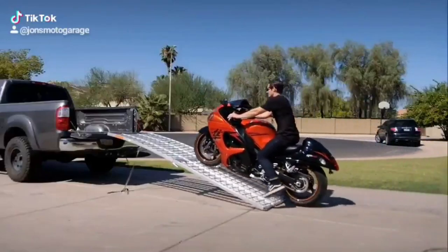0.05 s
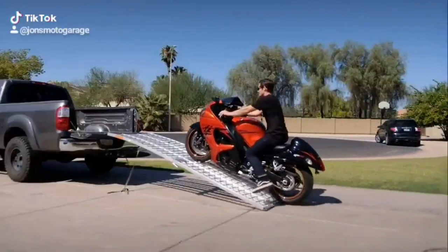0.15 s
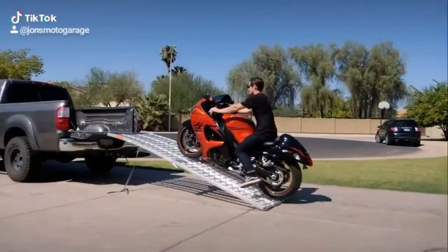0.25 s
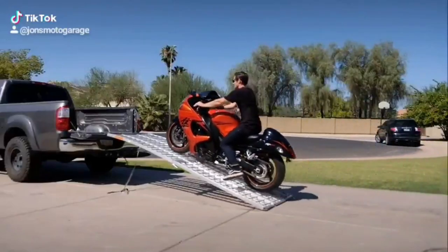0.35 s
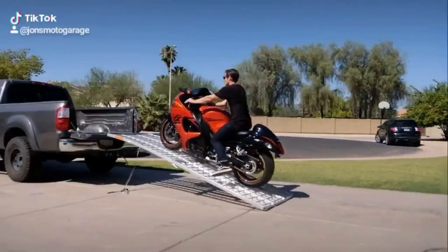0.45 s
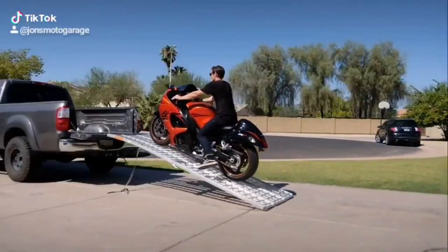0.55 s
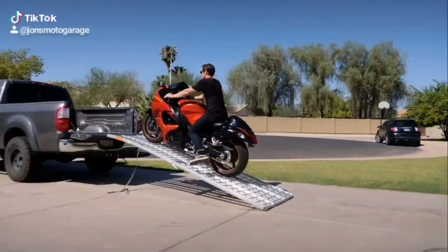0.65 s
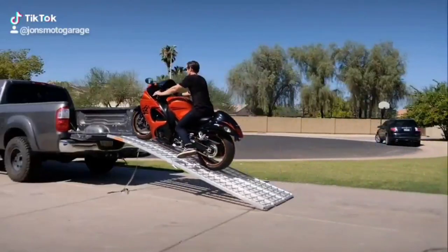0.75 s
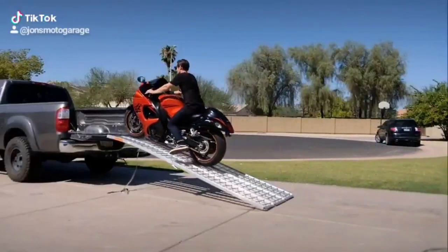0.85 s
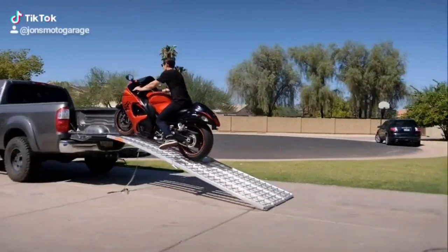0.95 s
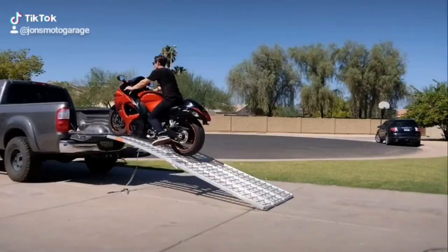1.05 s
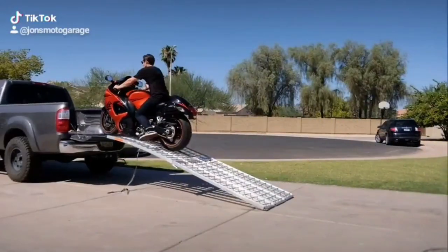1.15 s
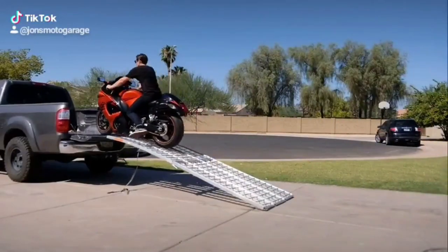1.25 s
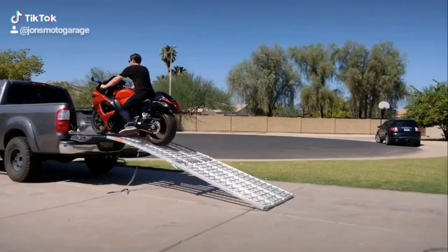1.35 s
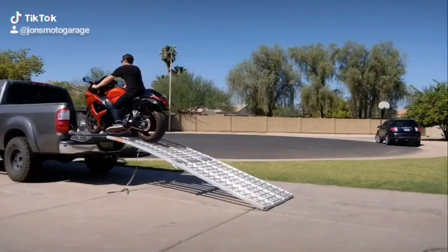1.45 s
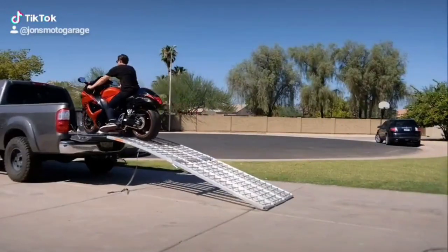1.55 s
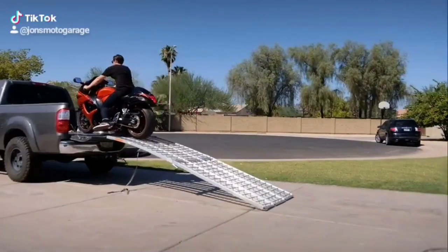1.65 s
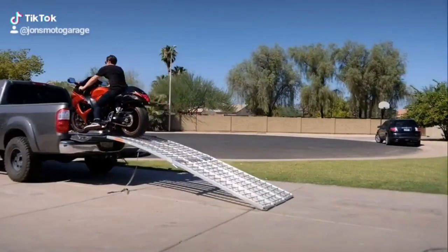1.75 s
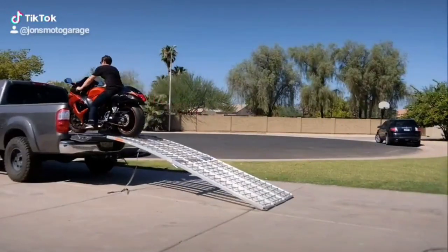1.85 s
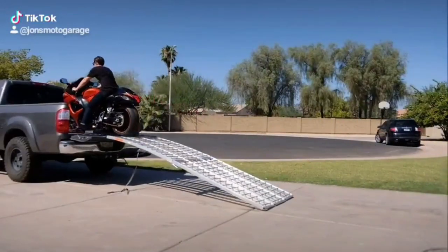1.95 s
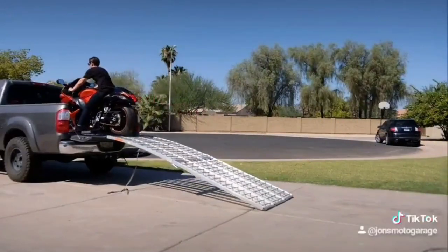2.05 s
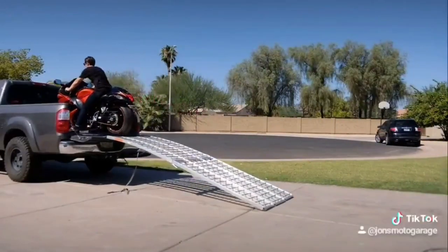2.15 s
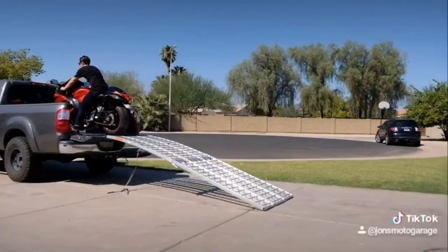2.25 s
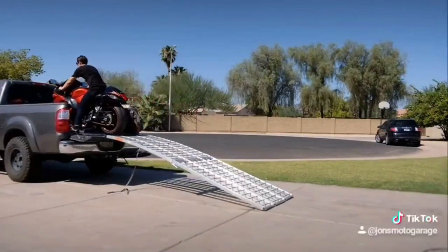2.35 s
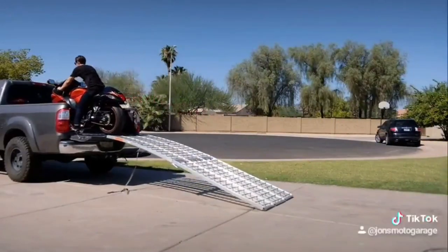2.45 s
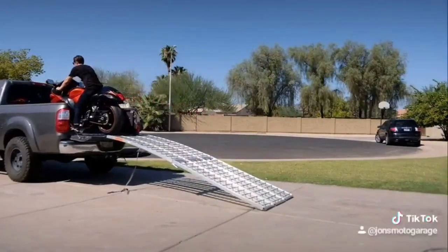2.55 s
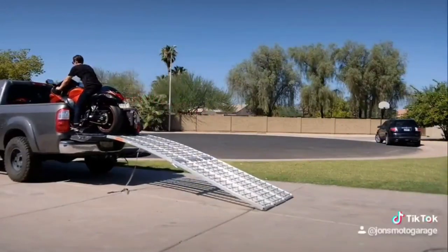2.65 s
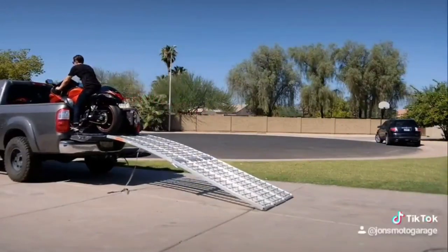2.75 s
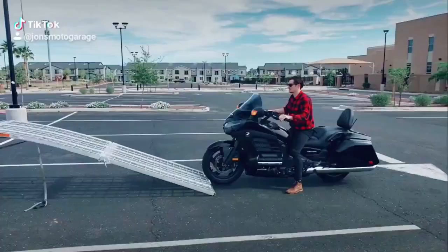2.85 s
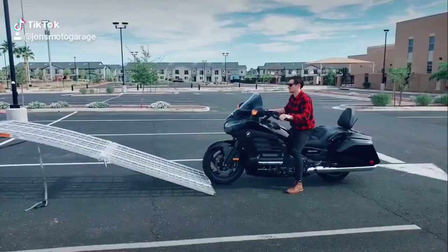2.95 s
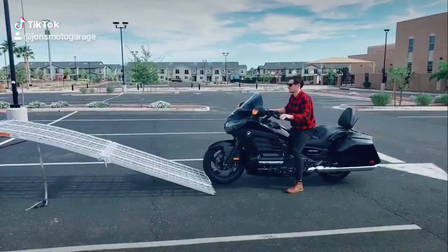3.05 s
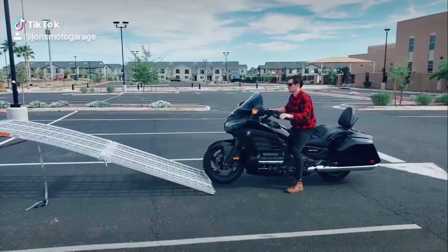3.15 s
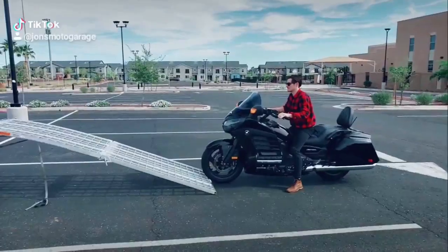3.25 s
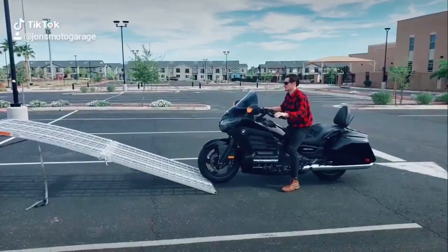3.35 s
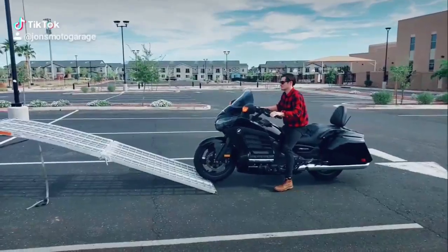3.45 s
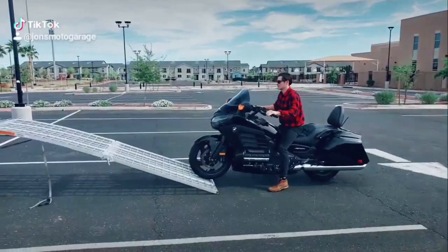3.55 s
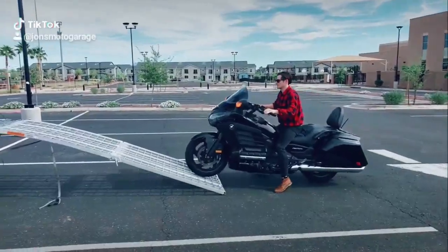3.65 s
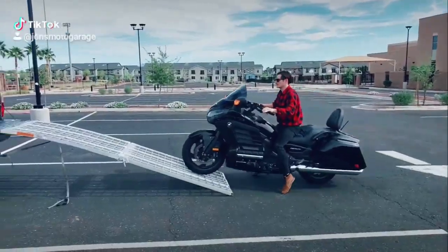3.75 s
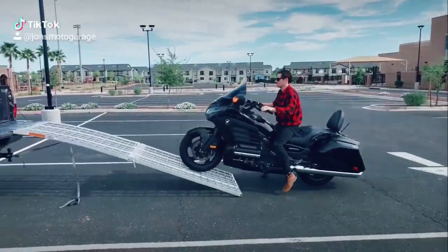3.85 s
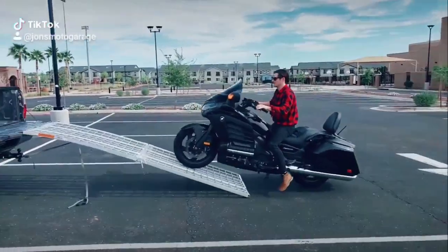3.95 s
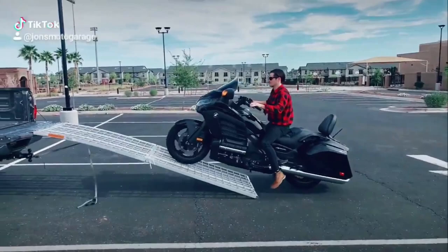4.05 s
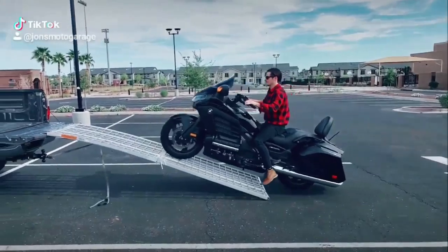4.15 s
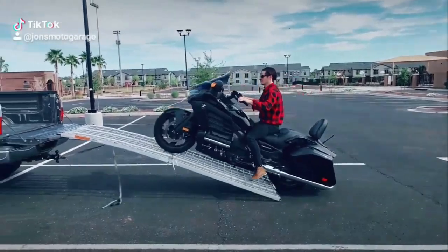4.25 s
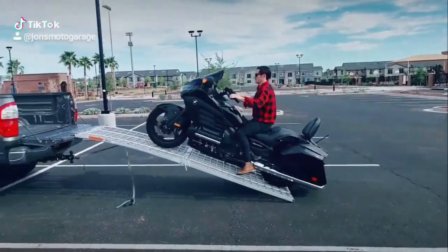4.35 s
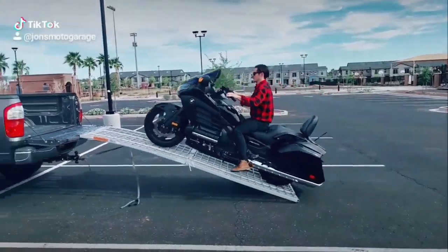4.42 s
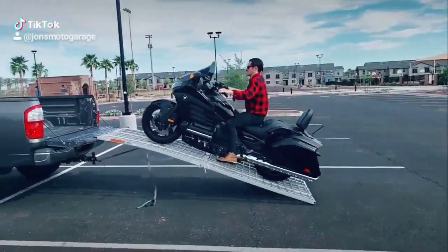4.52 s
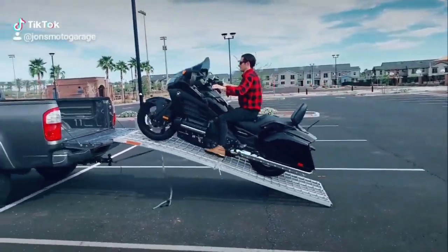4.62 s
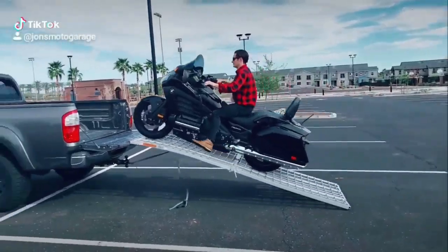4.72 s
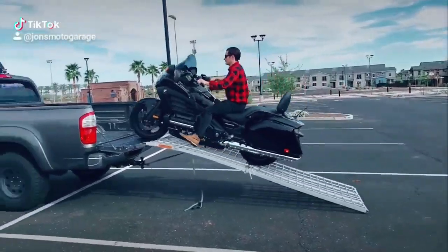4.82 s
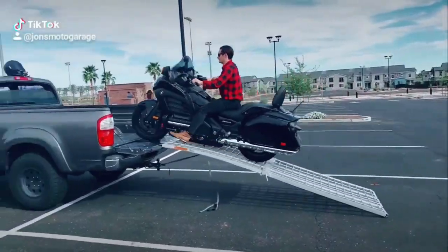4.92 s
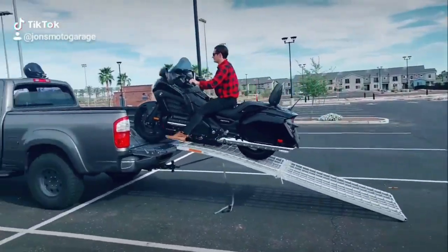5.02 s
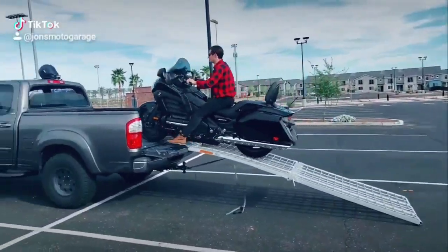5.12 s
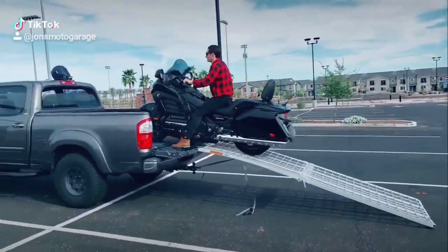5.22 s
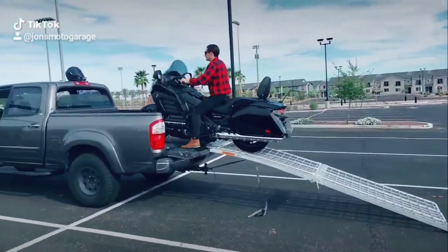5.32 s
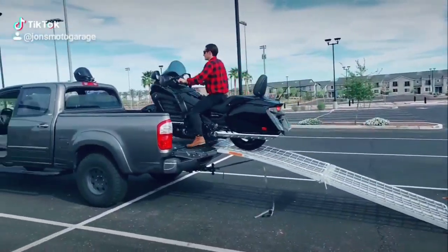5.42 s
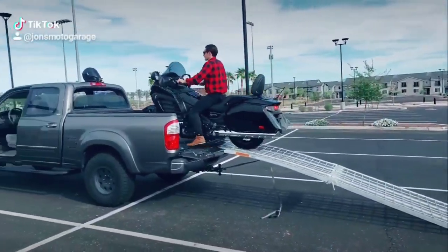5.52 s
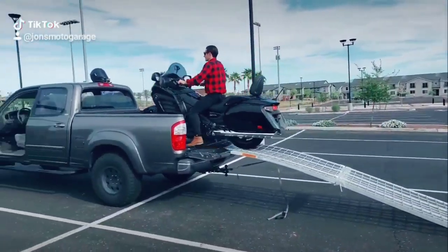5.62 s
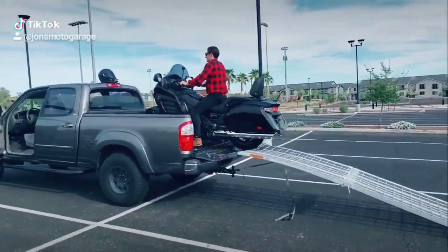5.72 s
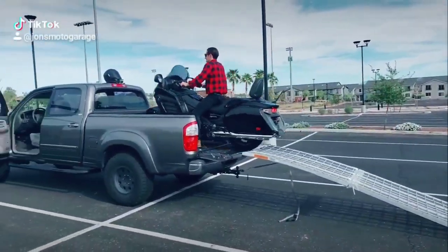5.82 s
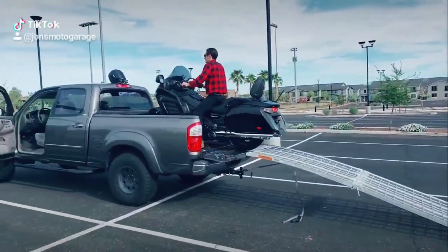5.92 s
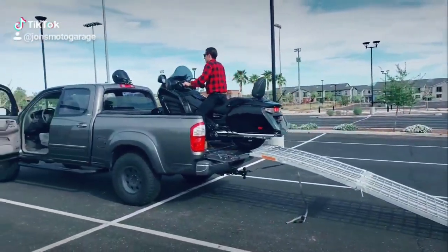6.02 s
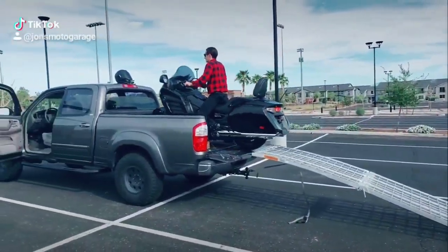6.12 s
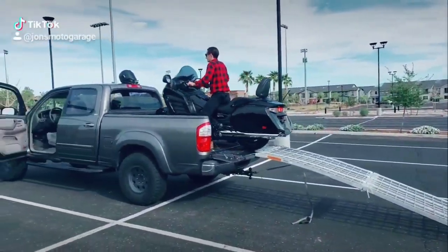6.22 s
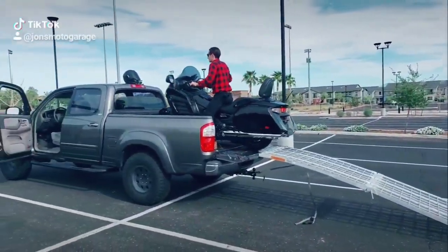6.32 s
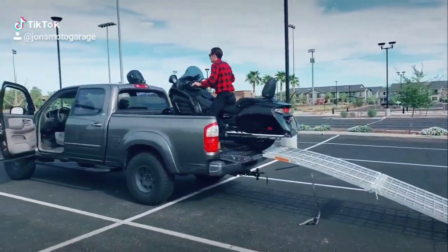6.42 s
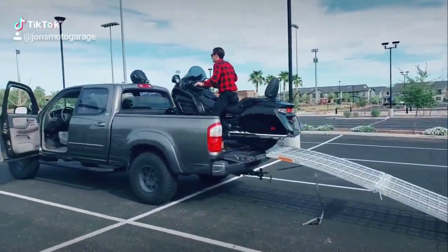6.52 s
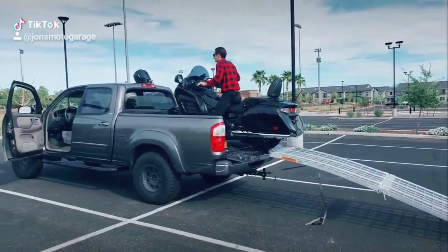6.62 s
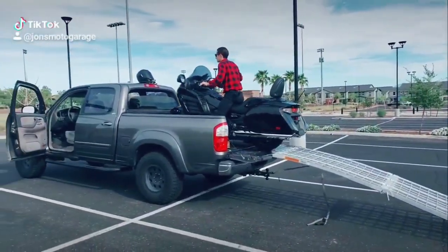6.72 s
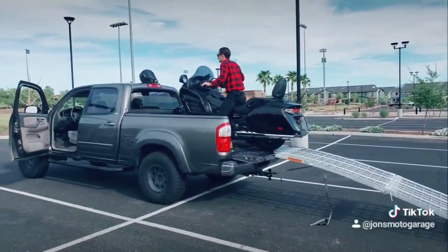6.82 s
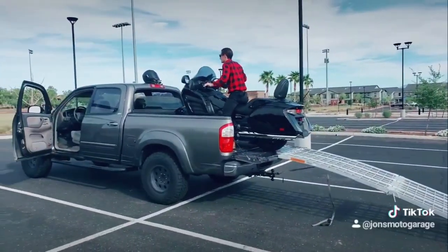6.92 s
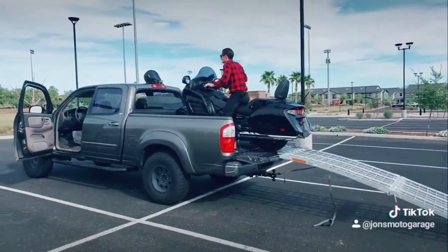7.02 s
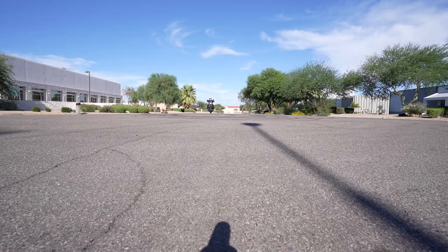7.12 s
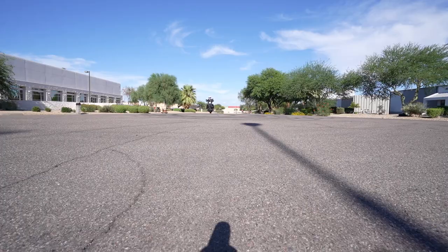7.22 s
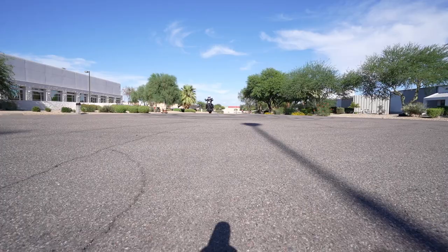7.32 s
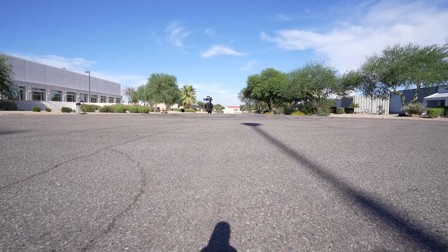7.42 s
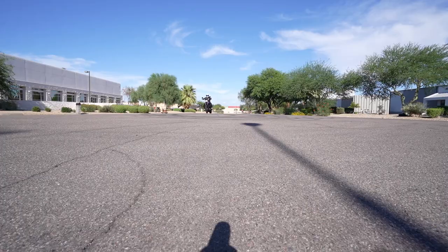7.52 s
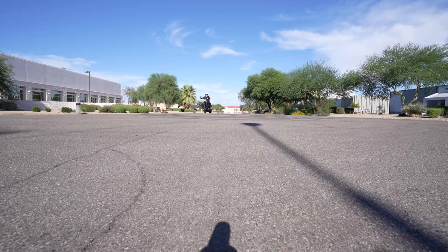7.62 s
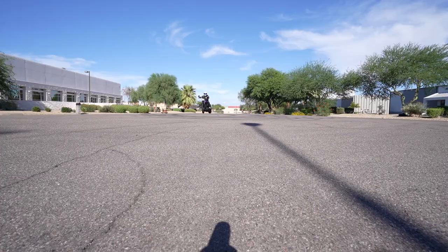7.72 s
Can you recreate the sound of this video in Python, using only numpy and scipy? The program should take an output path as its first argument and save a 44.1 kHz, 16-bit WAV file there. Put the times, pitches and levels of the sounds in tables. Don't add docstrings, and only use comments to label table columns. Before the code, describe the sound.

Outdoors, a four-cylinder motorcycle pulls steadily up an aluminium ramp with a few light knocks, then closes its throttle to an uneven, ringing idle. After a tiny silent splice, a heavy touring bike revs up with gear whine; rungs rattle and bang loudly at the top before it quiets. Finally a distant bike howls and rasps toward the small stereo microphone, with low wind rumble.

```python
import sys
import numpy as np
from scipy import signal
from scipy.fft import rfft, irfft, next_fast_len
from scipy.io import wavfile
from scipy.ndimage import uniform_filter1d

SR = 44100
rng = np.random.default_rng(int(sys.argv[2]) if len(sys.argv) > 2 else 0)


def convert_level_to_amplitude(level_db):
    exponent = np.asarray(level_db, float) / 20
    return 10 ** exponent


def store_wav(level_fs):
    pcm = np.round(np.clip(np.atleast_2d(level_fs), -1, 1) * 32767)
    wavfile.write(sys.argv[1], SR, pcm.T.astype(np.int16))


N = 342641
TIME = np.arange(N) / SR
PADDED = next_fast_len(N)


def in_time(rows):
    s, *columns = np.transpose(rows)
    since_start = TIME - s[0] + (s[0] < .01)
    until_end = s[-1] - TIME + (s[-1] > 7.7)
    gate = np.clip(np.minimum(since_start, until_end) / .004, 0, 1)
    return [np.interp(TIME, s, c) for c in columns] + [gate]


def bump(s, half_s):
    return np.exp(-((TIME - s) / half_s) ** 2)


def hill(hz, top_hz, width_hz, top_db):
    return top_db / (1 + (2 * (hz - top_hz) / width_hz) ** 2)


def evened(x, span_s=0.022):
    return x / np.sqrt(uniform_filter1d(x ** 2, size=round(span_s * SR)) + 1e-12)


def drift(rate):
    knots = rng.standard_normal(round(N / SR * 60) + 2)
    return np.interp(TIME * min(rate, 59), np.arange(len(knots)), knots) * 1.22


def filtered(x, hz, order, kind="low"):
    return signal.sosfilt(signal.butter(order, hz, kind, fs=SR, output="sos"), x)


def resonate(x, hz, width_hz):
    r = np.exp(-np.pi * width_hz / SR)
    poles = [1, -2 * r * np.cos(2 * np.pi * hz / SR), r * r]
    return signal.lfilter([(1 - r * r) / 2, 0, (r * r - 1) / 2], poles, x + 1e-18)


def pipes(x, modes):
    return sum((-1) ** k * convert_level_to_amplitude(db) * resonate(x, hz, width) for k, (hz, width, db) in enumerate(modes))


def firings(turns, pattern_db, spread_db, jitter):
    at = np.flatnonzero(np.diff(np.floor(turns + jitter * drift(40))) > 0)
    clicks = np.zeros(N)
    clicks[at] = convert_level_to_amplitude(np.resize(pattern_db, len(at)) + spread_db * rng.standard_normal(len(at)))
    return clicks


# (time [s], crank turns [Hz], exhaust level [dB])
SPORT = [(0, 50.96, -31.5), (0.2, 47.4, -28.5), (0.56, 47.38, -30), (0.76, 44.8, -32), (0.92, 45.7, -32.5),
         (1.24, 44.72, -33), (1.31, 45.84, -27), (1.4, 42.27, -23.5), (1.53, 31.13, -29), (1.57, 30, -32.5),
         (1.65, 28.04, -31), (1.705, 25.67, -35), (1.79, 30.9, -32), (1.83, 35.75, -26.5),
         (1.864, 38.8, -31.5), (1.904, 43.14, -26.5), (1.986, 45.45, -33), (2.07, 39.83, -30),
         (2.11, 37.05, -33.5), (2.15, 35.93, -27.5), (2.28, 39.5, -30.5), (2.42, 41.45, -31),
         (2.6, 37.98, -32), (2.87, 38.82, -31.5)]
# (multiple, level against the exhaust [dB])
SPORT_ORDERS = [(1, -41), (2, -8), (3, -30), (4, -2), (5, -7.5), (6, -4), (7, -25), (8, -10.5), (9, -19.5),
                (10, -12), (11, -26), (12, -13.5), (13, -26), (14, -17), (15, -33), (16, -19), (18, -44),
                (36, -32.5)]
# (pitch [Hz], width [Hz], lift [dB])
SPORT_PIPE = [(62.4, 17, 17.5), (174.3, 15.7, 10.5), (379.6, 55, 9.5)]
# (multiple, time [s], half length [s], lift [dB])
SPORT_GLINTS = [(14, 0.18, 0.17, 7), (14, 0.55, 0.12, -5), (12, 0.17, 0.14, 4), (10, 0.12, 0.06, 4),
                (10, 0.42, 0.16, -5), (16, 0.53, 0.13, 6), (16, 0.15, 0.2, -5), (8, 0.35, 0.2, 3),
                (8, 1.15, 0.15, -3), (10, 0.95, 0.3, 5), (4, 1.05, 0.3, 3), (11, 0.95, 0.2, 5),
                (13, 0.98, 0.2, 8), (15, 1.0, 0.15, 11), (16, 1.0, 0.25, -7), (6, 1.0, 0.3, -2),
                (14, 1.31, 0.04, 9), (5, 1.32, 0.03, 8), (6, 1.32, 0.03, 7)]
SPORT_CYLINDERS_DB = [-0.5, -8.5, 3.5, -12.5]
# (pitch [Hz], width [Hz], level [dB])
SPORT_BOOM = [(40, 30, -26.5), (85.4, 30, 2.5), (113.6, 4.7, 7.5), (184.3, 4.5, 11), (248, 53, -10.5)]
# (pitch [Hz], width [Hz], level [dB])
SPORT_BARK = [(257, 84, 4.5), (312, 25, 9.5), (353, 70, 0)]
# (multiple, level [dB])
IDLE_LINES = [(1, -16.5), (2, -8.5), (3, -8), (4, -12), (5, -6.5), (6, -11), (7, -16), (8, -20)]
SHUT_S, HANDOVER_S = 1.27, 0.35
SHUT_DB_PER_S = 33.5
IDLE_BOOM_DB, IDLE_BARK_DB = -5, -17
BLIP_DB = {4: 13, 5: -13}


def sport_bike():
    crank_hz, level_db, gate = in_time(SPORT)
    angle = 2 * np.pi * np.cumsum(crank_hz * (1 + 0.0015 * drift(27))) / SR
    turns = angle / (2 * np.pi)
    shut = np.maximum(TIME - SHUT_S, 0)
    idling = np.clip(shut / HANDOVER_S, 0, 1) ** 2

    pull = 0
    for k, db in SPORT_ORDERS:
        k = round(k)
        lift_db = sum(hill(k * crank_hz, *mode) for mode in SPORT_PIPE)
        for which, s, half_s, glint_db in SPORT_GLINTS:
            if round(which) == k:
                lift_db = lift_db + glint_db * bump(s, half_s)
        loss_db = SHUT_DB_PER_S * abs(k - 2) * shut
        phase = -0.0313 * k * k + 2.36 * (k % 2)
        pull = pull + convert_level_to_amplitude(db + lift_db - loss_db + 1.1 * drift(8.98)) * np.sin(k * angle + phase)

    pulses = firings(turns, SPORT_CYLINDERS_DB, 1.6, .025)
    every_second = pulses * (np.floor(turns) % 2)
    tick = resonate(resonate(every_second, 730, 70), 720, 83)
    pulses = filtered(pulses, 430, 4)
    boom = convert_level_to_amplitude(IDLE_BOOM_DB) * evened(pipes(pulses, SPORT_BOOM), 0.035)
    bark = convert_level_to_amplitude(IDLE_BARK_DB) * evened(resonate(pipes(pulses, SPORT_BARK), 390, 250), 0.094)
    hum = 0
    for k, db in IDLE_LINES:
        lift_db = hill(k * crank_hz, 194.3, 34, 9.5) + BLIP_DB.get(round(k), 0) * bump(1.956, 0.059)
        hum = hum + convert_level_to_amplitude(db + lift_db + 1.3 * drift(20)) * np.cos(k * angle - 0.59 * k)
    idle = convert_level_to_amplitude(level_db) * (boom + bark + hum) + convert_level_to_amplitude(-61.5) * (TIME > 2.25) * tick / tick.std()

    sound = idling * idle - np.sqrt(2) * (1 - idling) * convert_level_to_amplitude(level_db) * pull
    load_db = np.where(TIME < 1.51, -120 * shut, level_db + 31.0)
    return gate * sound, np.where(shut > 0, turns, 2 * turns), load_db


# (time [s], half firing rate [Hz], firing tone [dB], load [dB])
TOURER = [(2.9, 36.92, -43, -29), (3.09, 32.14, -43.5, -28), (3.17, 35.3, -41.5, -18.5),
          (3.22, 39.93, -32.5, -10.5), (3.36, 50.5, -24.5, -3.5), (3.59, 57.83, -23.5, 1.5),
          (4.11, 57, -23.5, 1.5), (4.5, 53.7, -24.5, 3.5), (4.9, 54.6, -22.5, 2.5), (4.99, 57.6, -35, -5.5),
          (5.04, 57.3, -32.5, 4), (5.26, 39.2, -40, -10.5), (5.4, 43.7, -49.5, -27.5),
          (5.61, 47.45, -50.5, -34.5), (5.92, 33.3, -57.5, -42), (6.17, 31.4, -56, -37.5),
          (6.47, 40.32, -37, -53.5), (6.65, 44.2, -36, -46), (6.8, 45.2, -38, -44.5),
          (7.15, 41.8, -36.5, -47.5)]
# (multiple of the half rate, level [dB], phase [rad])
TOURER_OVERTONES = [(1, -21, 0.16), (3, -6, 0.44), (4, -4.5, 0.11), (5, -6, -0.63), (6, -14.5, -0.31),
                    (7, -25.5, 0.011), (10, -22.5, -2.16)]
OVERTONES_DB, FLUTTER_DB = -31, -35
FLUTTER_FOLLOWS = 0.33
REV_DB = 11.5


def tourer():
    half_hz, tone_db, load_db, gate = in_time(TOURER)
    flutter = resonate(rng.standard_normal(N), 120, 54)
    upper_pipe = resonate(rng.standard_normal(N), 160, 185)
    flutter = flutter + np.where(TIME < 5.4, .8, .1) * upper_pipe
    flutter = evened(filtered(flutter, 380, 4), 1.0)

    coasting = 1 + 2.5 * ((TIME > 4.95) & (TIME < 6.2) | (TIME < 3.15))
    angle = 2 * np.pi * np.cumsum(half_hz * (1 + 0.0052 * coasting * drift(24.81))) / SR
    overtones = 0
    for k, db, phase in TOURER_OVERTONES:
        rev_db = REV_DB * (k > 3) * bump(3.14, 0.22)
        pipe_db = (TIME < 5) * hill(k * half_hz, 279.5, 31, 8) - 2.4 * (TIME > 5)
        waver_db = 1.5 * coasting * drift(30)
        overtones = overtones + convert_level_to_amplitude(db + rev_db + pipe_db + waver_db) * np.cos(k * angle + phase)
    tone = convert_level_to_amplitude(tone_db + 0.67 * coasting * drift(25)) * np.cos(2 * angle)
    sound = -np.sqrt(2) * (tone + convert_level_to_amplitude(OVERTONES_DB + load_db) * overtones)
    sound = sound + convert_level_to_amplitude(FLUTTER_DB + FLUTTER_FOLLOWS * load_db) * flutter
    return gate * sound, angle / np.pi, (load_db + tone_db + 23.0) / 2


# (time [s], howl pitch [Hz], level [dB])
FAR = [(7.152, 619, -44), (7.19, 699, -42.5), (7.205, 657, -37.5), (7.24, 648, -34.5), (7.28, 645, -29),
       (7.34, 603.4, -24), (7.39, 533, -21.5), (7.45, 503.7, -21), (7.49, 581.3, -20.5),
       (7.55, 580.5, -20.5), (7.58, 605, -18), (7.74, 627.5, -20.5), (7.77, 655, -17.5)]
# (pitch [Hz], width [Hz], level [dB])
FAR_PIPES = [(409, 60, 10), (615, 73, 15.5), (800, 31.5, 21), (925, 47, 13.5), (1186, 77, 6.5),
             (1660, 54, -6.5), (2540, 270, -18), (2540, 28, -15)]
# (multiple, level [dB])
HOWL_OVERTONES = [(2, -12), (3, -14)]
HOWL_OPENS_S = 7.42


def far_bike():
    howl_hz, level_db, gate = in_time(FAR)
    pulses = firings(121 * TIME, [0, -4], 4., 0.302)
    ragged = pulses + 0.2 * rng.standard_normal(N)

    angle = 2 * np.pi * np.cumsum(howl_hz * (1 + 0.01556 * drift(45))) / SR
    opened = np.clip((TIME - HOWL_OPENS_S) / 0.068, 0, 1)
    howl = np.sin(angle) * convert_level_to_amplitude(2.8 * drift(50))
    for k, db in HOWL_OVERTONES:
        howl = howl + opened * convert_level_to_amplitude(db + 4.1 * drift(40)) * np.cos(k * angle)

    rasp = pipes(ragged * convert_level_to_amplitude(2.1 * drift(55)), FAR_PIPES)
    rasp_db = level_db - 4.0 + 9.5 * bump(7.3, 0.076)
    thud = pipes(ragged, [(68.3, 10.2, 12.5), (108, 120.0, -2.0), (225, 46.0, 3.0)])
    thud_db = -32.5 + 7 * bump(7.24, 0.1) - 3.8 * bump(7.15, 0.014)
    sound = convert_level_to_amplitude(level_db - 6.0) * evened(howl) + convert_level_to_amplitude(rasp_db) * evened(rasp) + convert_level_to_amplitude(thud_db) * evened(thud)
    sound = sound + 0.67 * sound ** 2
    return gate * .22 * np.tanh(sound / .22)


# (time [s], peak [dB], body below peak [dB], edge below peak [dB], clang pitch [Hz])
CLANKS = [(1.1678, -24, -10.5, -29, 1204), (1.293, -42.5, 8.5, -49, 900), (2.082, -23.5, -6, -55, 1381),
          (4.5696, -19.5, -1, -3, 3412), (4.604, -22.5, -0.5, -24.5, 1631), (4.753, -30, -3.5, -13, 1800),
          (4.896, -21.5, -3, -4.5, 3500), (4.996, -10.5, -0.5, -7, 1500), (5.062, -24, -3, -6, 1500),
          (5.1768, -22, -5, -39, 1370), (5.9591, -17, -5.5, -5.5, 1890), (7.7644, -14, 7, -10.5, 1270)]
# (time [s], peak [dB])
KNOCKS = [(0.0904, -50), (0.639, -38), (1.0014, -38), (1.421, -38), (1.52, -55), (1.7792, -48),
          (1.83, -42.5), (1.86, -51), (1.89, -52), (2.2623, -51), (4.3888, -34.5), (4.4853, -34),
          (4.5001, -33), (4.721, -34), (4.9775, -32.5), (5.1665, -47), (5.303, -33.5), (6.79, -50),
          (4.526, -30), (4.798, -23.5), (4.827, -20.5), (4.859, -26.5), (4.929, -22), (5.2705, -35.5),
          (5.3488, -37.5), (5.4954, -39.5), (5.6425, -44), (5.739, -49), (5.95, -44), (6.059, -42.5),
          (6.125, -47.5), (6.2617, -46), (6.569, -47.5), (7.206, -55)]
# (pitch [Hz], level [dB], width [Hz])
LIGHT_RAMP = [(1100, -18, 110), (1270, 0, 150), (1500, 6, 190), (1800, -5.5, 120), (1940, -2.5, 420),
              (2650, -4, 200)]
# (pitch [Hz], level [dB], width [Hz])
RAMP = [(1280, -6, 490), (1627, 5, 54), (1807, -1.5, 46), (1866, -1.5, 58), (2070, 0.5, 70), (2248, 7, 98),
        (2445, 2.5, 49)]
# (pitch [Hz], level [dB], width [Hz])
RAMP_RUNGS = [(3236, 1, 74), (3500, 2, 100), (3795, 2, 110), (4510, -0.5, 260), (5110, -5.5, 150),
              (5740, 0, 320)]
# (pitch [Hz], level [dB], width [Hz])
RAMP_BODY = [(222, 17.5, 31), (361, 10, 53), (462, 5, 32), (646, 11.5, 73), (744, 13, 44), (906, 6, 58)]
# (pitch [Hz], level [dB], width [Hz])
RAMP_EDGE = [(6370, 8.5, 290), (7370, 1.5, 330), (8830, -4.5, 810), (11500, -3, 2200), (12600, -1, 900)]
CLANK_T60_S, CLANK_SWELL_S = 0.13, 0.009
KNOCK_T60_S, KNOCK_SWELL_S = 0.18, 0.002
KNOCK_BODY_DB, KNOCK_EDGE_DB, KNOCK_HZ = -4.5, -23, 1670
CLANG_SPREAD = 0.096
GRIT_S, GRIT_DB = 0.001, 3.5
HOLD_S = 0.02
CRACK_DB, CRACK_T60_S = -5, 0.012
RUNGS_DB, RUNGS_FOLLOW = -7, 0.12


def ramp_blows():
    blows = [(*row, CLANK_T60_S, CLANK_SWELL_S, 0) for row in CLANKS]
    blows += [(*row, KNOCK_BODY_DB, KNOCK_EDGE_DB, KNOCK_HZ, KNOCK_T60_S, KNOCK_SWELL_S, 1) for row in KNOCKS]
    out, chance = np.zeros((2, N)), rng.standard_normal((60, 8))
    grit_db = GRIT_DB * rng.standard_normal(N)[(TIME / GRIT_S).astype(int)]
    chatter = rng.standard_normal((2, N)) * convert_level_to_amplitude(grit_db)
    parts = [[convert_level_to_amplitude(db) * resonate(chatter, hz, width) / np.sqrt(width) for hz, db, width in modes]
             for modes in (LIGHT_RAMP, RAMP, RAMP_RUNGS, RAMP_BODY, RAMP_EDGE)]

    for (s, peak_db, body_db, edge_db, spot_hz, t60, swell_s, loose), luck in zip(blows, chance):
        span = slice(round(s * SR) - 130, min(round((s + .3) * SR), N))
        age = TIME[span] - TIME[span][0]
        struck = [parts[int(s > 2.87)], *parts[2:]]
        deck, rungs, body, edge = [sum(convert_level_to_amplitude(2. * c) * mode[:, span] for c, mode in zip(luck, modes))
                                   for modes in struck]
        clang = resonate(chatter[:, span], spot_hz * (1 + CLANG_SPREAD * luck[-1]), 300) / np.sqrt(300)
        deck = filtered(deck + clang, 2750, 6)
        rungs = filtered(rungs + 2 * (spot_hz > 2750) * clang, 7800, 4)
        edge = filtered(edge, 13800, 4)

        swell = 0.78 * (1 - np.exp(-age / swell_s))
        crack = loose * convert_level_to_amplitude(CRACK_DB - 60 * (age - .003) / CRACK_T60_S) * (age > .003)
        rungs_db = RUNGS_DB + RUNGS_FOLLOW * edge_db - 6.8 * (5.03 < s < 5.5)
        layers = [(deck, -1.5, 1.1), (rungs, rungs_db, 0.7), (body, body_db + 0.5, 1.5), (edge, edge_db, .3)]
        for ringing, level_db, slower in layers:
            early = convert_level_to_amplitude(-60 * np.maximum(age - HOLD_S, 0) / (slower * t60))
            late = convert_level_to_amplitude(-17.5 - 60 * age / (0.49 * slower))
            shape = swell * (early + late) + crack
            out[:, span] += convert_level_to_amplitude(peak_db + level_db - 7.5) * shape * ringing / ringing.std()
    return out


# (time [s], peak [dB],
# ringing pitch [Hz])
TICKS = [(0.0914, -39, 1500), (1.0015, -41, 1500), (1.167, -28.5, 2530), (2.088, -18, 1500),
         (2.855, -39, 3000), (4.3884, -43, 3500), (4.4447, -53, 3500), (4.487, -22, 1800),
         (4.502, -28, 1500), (4.529, -26, 4600), (4.5687, -15.5, 3500), (4.605, -21, 5300),
         (4.7223, -34, 5300), (4.754, -27, 6400), (4.791, -25, 5300), (4.8214, -23, 5300),
         (4.8578, -23, 3610), (4.8916, -23.5, 3630), (4.999, -12, 2415), (5.001, -27.5, 11500),
         (5.962, -32, 5000), (5.0595, -16, 1500), (5.1646, -34, 4010), (5.181, -22, 1390),
         (5.271, -30.5, 4040), (5.346, -37, 4010), (5.934, -54, 11730), (6.568, -46, 1500),
         (7.203, -47, 900), (7.7645, -27, 10580)]
TICK_T60_S, TICK_SWELL_S = 0.098, 0.001
TICK_WIDTH_SHARE = 0.14
TICK_SPRAY_DB = -8.5


def rung_ticks():
    out, white = np.zeros((2, N)), rng.standard_normal((2, N))
    for s, peak_db, hz in TICKS:
        span = slice(round(s * SR), min(round((s + .06) * SR), N))
        age = TIME[span] - TIME[span][0]
        spray = filtered(white[:, span], [.45 * hz, min(1.45 * hz, 15000)], 2, "band")
        spot = resonate(white[:, span], hz, TICK_WIDTH_SHARE * hz)
        fall = convert_level_to_amplitude(peak_db - 9.5 - 60 * age / TICK_T60_S) * (1 - np.exp(-age / TICK_SWELL_S))
        out[:, span] += fall * (spot / spot.std() + convert_level_to_amplitude(TICK_SPRAY_DB) * spray / spray.std())
    return out


# (pitch [Hz], level [dB], width [Hz])
RATTLE = [(1800, 4.5, 90), (2540, -1, 130), (3570, 3.5, 130), (4600, -12.5, 150), (5300, -2, 130),
          (6400, -4.5, 150), (7660, -3, 160)]
RATTLE_S, RATTLE_HALF_S, RATTLE_DB, RATTLE_PER_S = 4.8, 0.26, -38, 180


def rung_rattle():
    span = slice(4 * SR, round(5.5 * SR))
    size, out = span.stop - span.start, np.zeros((2, N))
    strength = convert_level_to_amplitude(4.3 * np.minimum(rng.exponential(1, (2, size)), 3))
    grains = (rng.random((2, size)) < RATTLE_PER_S / SR) * strength
    buzz = 0
    for hz, db, width in RATTLE:
        dealt = rng.random((2, size)) < .5
        buzz = buzz + convert_level_to_amplitude(db) * resonate(grains * dealt, hz, width) / width
    buzz = filtered(buzz, 8000, 4)
    out[:, span] = convert_level_to_amplitude(RATTLE_DB) * bump(RATTLE_S, RATTLE_HALF_S)[span] * buzz / buzz.std()
    return out


# (start [s], length [s], level [dB])
WHINE = [
    (2.69, 0.68, -49.5),
    (3.2, 1.15, -58),
    (5.3, 0.67, -66),
    (6.176, 0.46, -60),
    (6.47, 0.9, -57),
]
WHINE_MULTIPLES = [2, 3, 4, 6, 9, 12, 18]
WHINE_DB = [
    [-8, -12, -1, -12, -13, -4, -8],
    [-30, -30, -30, -6, -12, -9, -30],
    [-30, -30, -30, -5, -2, -7, -30],
    [2, -16, -14, -18, -26, -15, -32],
    [3, -9, -2, -8, -8, -16, -32],
]
WHINE_FADE_S = 0.19
TEETH_PER_HALF = 8.03
OVERRUN_S, OVERRUN_HZ, OVERRUN_SAG_PER_S = 5.45, 497, 1.45


def gear_whine():
    grain = filtered(rng.standard_normal((7, N)), 90, 2)
    overrun_hz = OVERRUN_HZ * np.exp(OVERRUN_SAG_PER_S * (OVERRUN_S - TIME))
    tooth_hz = np.where(abs(TIME - 5.6) < .42, overrun_hz, TEETH_PER_HALF * in_time(TOURER)[0])
    angle = 2 * np.pi * np.cumsum(tooth_hz * (1 + .004 * drift(58))) / SR
    swells = [convert_level_to_amplitude(db) * np.clip(np.minimum(TIME - s, s + length_s - TIME) / WHINE_FADE_S, 0, 1)
              for s, length_s, db in WHINE]
    out = 0
    for k, strengths_db, blur in zip(WHINE_MULTIPLES, np.transpose(WHINE_DB), grain / grain.std()):
        unsteady = (1 + blur * k * tooth_hz / 5000) / (1 + (k * tooth_hz / 6300) ** 12)
        out = out + convert_level_to_amplitude(strengths_db) @ swells * convert_level_to_amplitude(3.2 * drift(22)) * unsteady * np.sin(k * angle)
    return out * (TIME > CUTS[1][0]) * (TIME < CUTS[1][1])


# (from [s], clatter [dB], hiss [dB], sizzle [dB], share of the load's swing)
GEAR = [
    (0, -34.5, -51, -64, 0.12),
    (1.51, -54, -54.5, -72, 0.96),
    (2.9, -50.5, -38, -50.5, 0.5),
    (5.45, -36.5, -39.5, -53.5, 0.66),
    (7.15, -30, -36.5, -57.5, 1),
]
# (pitch [Hz], level [dB per Hz])
GEAR_MID = [
    [(30, -34.5), (80, 6), (310, 5.5), (520, -2.5), (579, -2), (1050, -13), (1690, -14), (1830, -11.5),
     (4120, -24.5), (13200, -45)],
    [(310, -1.5), (520, -6.5), (603, -11.5), (720, -9), (893, -18.5), (4010, -41), (13200, -62)],
    [(300, -49), (560, 21), (781, 12), (1250, -9), (3440, -17.5), (8780, -32), (12100, -27.5), (15600, -34)],
    [(240, -64), (400, -5.5), (695, 10.5), (958, -4), (2400, -11), (2890, -17.5), (15600, -24.5)],
    [(400, -23), (520, -8.5), (724, -12.5), (965, -12), (1710, -13), (2870, -17), (3340, -24.5),
     (15600, -72)],
]
# (pitch [Hz], width [Hz], lift [dB])
CASING = [
    [(1692, 36, 7.6)],
    [(678.2, 30, 3.6)],
    [(1500, 240, 7.55), (1676, 34, 9.7), (2230, 1060, 7.1), (3002, 62, 9.5), (3420, 260, 5.5),
     (5590, 120, 9), (6370, 640, 4.6)],
    [(782, 8.8, 13), (2360, 110, 1.3)],
    [(1800, 38, 3.4)],
]
RUMBLE_S, RUMBLE_RISE_S, RUMBLE_DB = 4.73, 0.27, 5.5


def running_gear(turns, load_db):
    out = np.zeros((2, N))
    puff = 1 + 0.14 * np.cos(2 * np.pi * turns)
    rumble_db = RUMBLE_DB * bump(RUMBLE_S, RUMBLE_RISE_S)
    ranges = [(1e-3, 1400, 1), (1400, 6000, 1), (6000, 1e6, 0)]
    edges = [round(row[0] * SR) for row in GEAR] + [N]
    for (_, *levels_db, follows), colour, casing, start, end in zip(GEAR, GEAR_MID, CASING, edges, edges[1:]):
        size = next_fast_len(end - start)
        hz = np.fft.rfftfreq(size, 1 / SR) + 1
        colour_hz, colour_db = np.transpose(colour)
        shape_db = np.interp(np.log(hz), np.log(colour_hz), colour_db)
        shape_db += sum(hill(hz, *mode) for mode in casing)
        noise = rfft(rng.standard_normal((2, size))) * convert_level_to_amplitude(shape_db)
        for level_db, (low, high, shaken) in zip(levels_db, ranges):
            slopes = np.sqrt((1 + (low / hz) ** 6) * (1 + (hz / high) ** 6))
            band = irfft(noise / slopes, size)[:, :end - start]
            gain = convert_level_to_amplitude(level_db + follows * load_db + shaken * rumble_db + 1.3 * drift(30)) * puff
            out[:, start:end] += gain[start:end] * band / band.std()
    return out


# (time [s], half length [s], level above calm [dB])
GUSTS = [
    (1.749, 0.17, 11),
    (2.615, 0.59, 12),
    (4.213, 0.84, 27),
    (5.561, 0.3, 26),
    (6.506, 0.33, 35),
    (7.24, 0.31, 40),
]
WIND_DB = -82.5


def wind():
    rumble = filtered(rng.standard_normal((3, N)), [24, 48], 2, "band")
    level_db = WIND_DB + sum(db * bump(s, half_s) for s, half_s, db in GUSTS)
    return convert_level_to_amplitude(level_db) * (rumble[2] + 1.1 * rumble[:2]) / rumble.std()


# (pitch [Hz], side minus centre [dB])
SIDE_SHARE = [(60, -51), (110, -22.5), (200, -36), (380, -17), (1290, -9), (2380, -5.5), (4400, -0.5),
              (15000, 1)]


def widen(mid, side):
    hz = np.fft.rfftfreq(PADDED, 1 / SR) + 1
    share_hz, share_db = np.transpose(SIDE_SHARE)
    share = convert_level_to_amplitude(np.interp(np.log(hz), np.log(share_hz), share_db))
    side = irfft((.93 * rfft(side, PADDED) - .33j * rfft(mid, PADDED)) * share, PADDED)[:N]
    return np.array([mid + side, mid - side])


# (start [s], end [s])
CUTS = [
    (0, 2.856),
    (2.895, 7.15),
    (7.15, 7.77),
]
LEFT_LEAN_DB = [
    0.0,
    -0.35,
    1.1,
]


def scene():
    sport, sport_turns, sport_db = sport_bike()
    tour, tour_turns, tour_db = tourer()
    engines = sport + tour + far_bike() + gear_whine()
    first, last = TIME < 2.87, TIME > CUTS[2][0]
    load_db = np.where(first, sport_db, np.where(last, in_time(FAR)[1] + 23, tour_db))
    turns = np.where(first, sport_turns, tour_turns)
    metal = ramp_blows() + rung_ticks() + rung_rattle() + running_gear(turns, load_db)
    lean_db = np.where(first, LEFT_LEAN_DB[0], np.where(last, LEFT_LEAN_DB[2], LEFT_LEAN_DB[1])) / 2
    twin = np.roll(engines, round(0.018 * SR))
    return widen(engines + metal[0], twin + metal[1]) * convert_level_to_amplitude([lean_db, -lean_db]) + wind()


def low_pass(x):
    return signal.sosfilt(signal.butter(12, 15800, fs=SR, output="sos"), x)


def record(dry):
    hz, s, cells = signal.stft(dry, SR, nperseg=1024)
    column_hz = hz[:, None]
    patches = rng.standard_normal((75, len(s) // 3 + 1)).repeat(7, axis=0).repeat(3, axis=1)
    patches = patches[:len(hz), :len(s)]
    bar = np.interp(hz, [2490, 7500, 9300, 12300, 13000, 16000], [4.2, 1.6, 0.9, 2.0, 1.2, .3])
    faint = np.interp(s, [1.2, 1.7], [.6, 1.3]) * (s < 2.87) * (column_hz > 3000)
    loud = uniform_filter1d(abs(cells), size=9, axis=1) > convert_level_to_amplitude(-70)
    below_top = column_hz < np.where(s < 2.87, 13100, 15700)
    kept = ((patches < bar[:, None] - faint) | loud) & below_top
    dip = convert_level_to_amplitude(hill(column_hz, 2870, 300, -2.5) * (abs(s - 5) < 2.15))
    worn = signal.istft(cells * kept * dip, SR, nperseg=1024)[1][:, :N]
    heard = (TIME < CUTS[0][1]) | (TIME > CUTS[1][0])
    mix = 0.39 * np.tanh(worn / 0.44) * heard
    return low_pass(mix)


dry = scene()
out = record(dry)
store_wav(out)
```